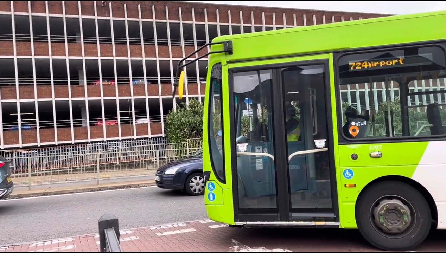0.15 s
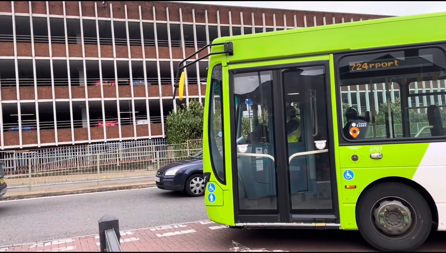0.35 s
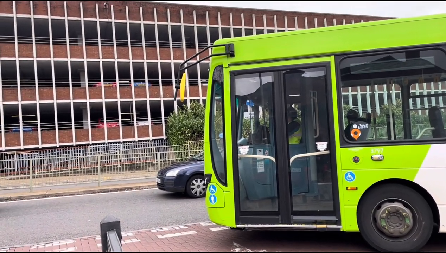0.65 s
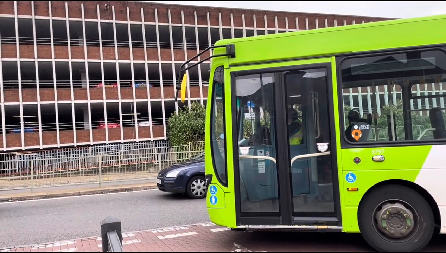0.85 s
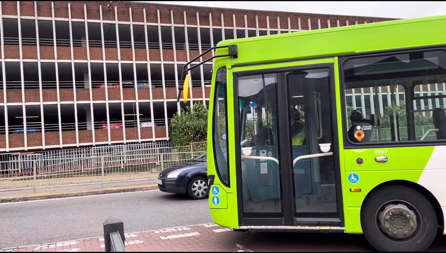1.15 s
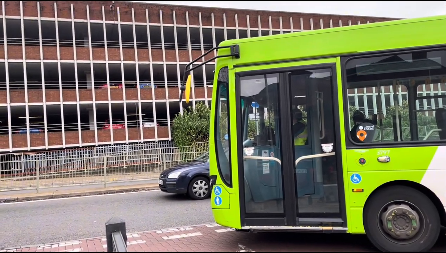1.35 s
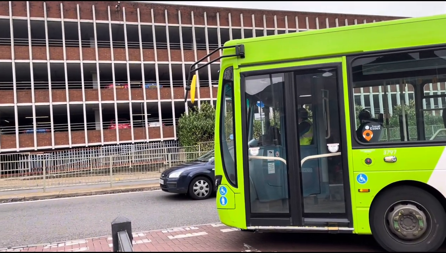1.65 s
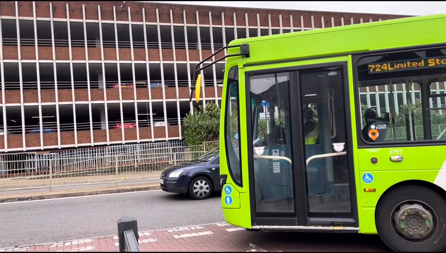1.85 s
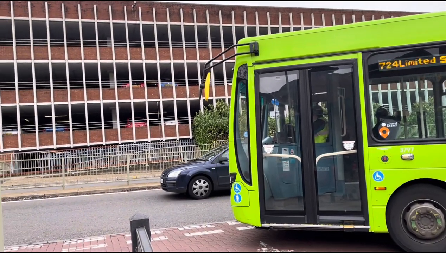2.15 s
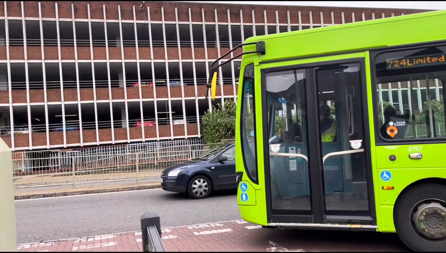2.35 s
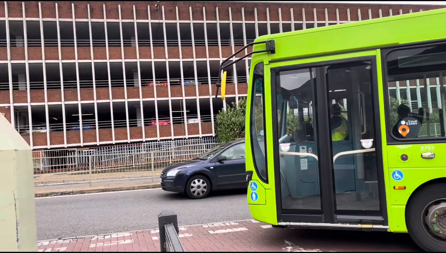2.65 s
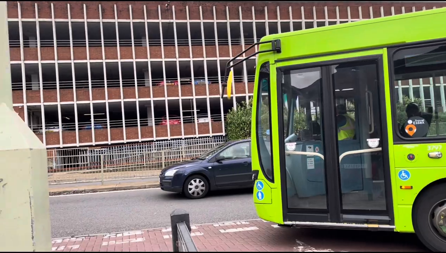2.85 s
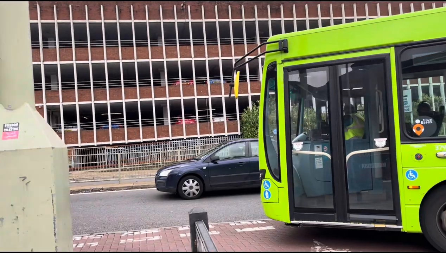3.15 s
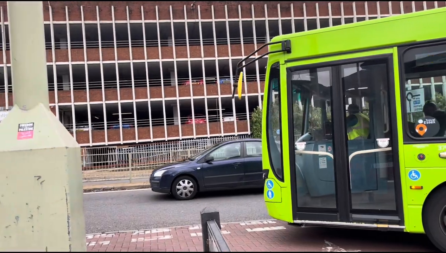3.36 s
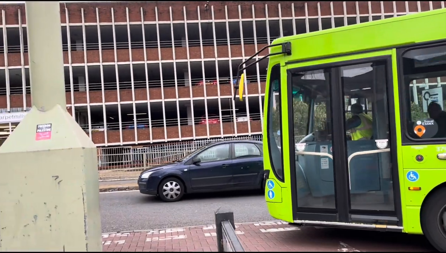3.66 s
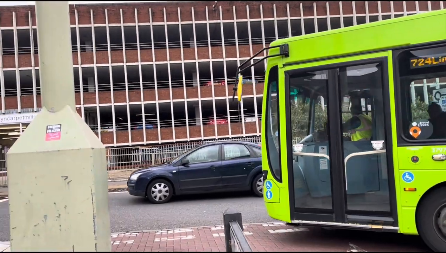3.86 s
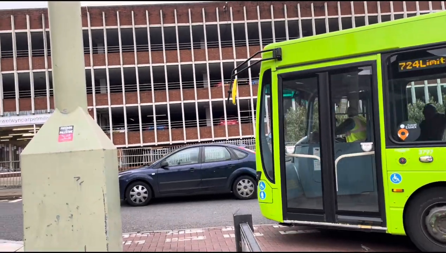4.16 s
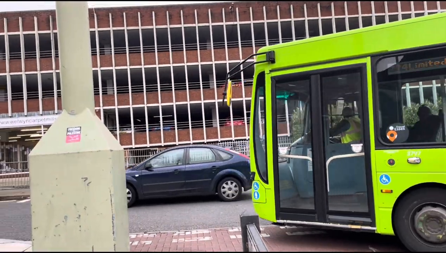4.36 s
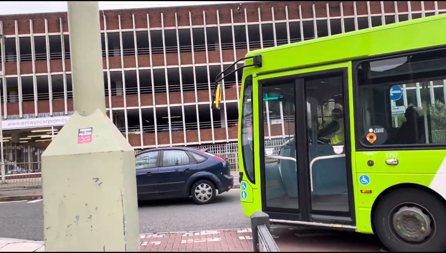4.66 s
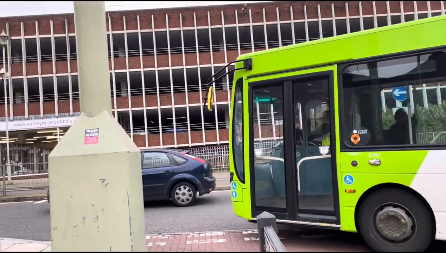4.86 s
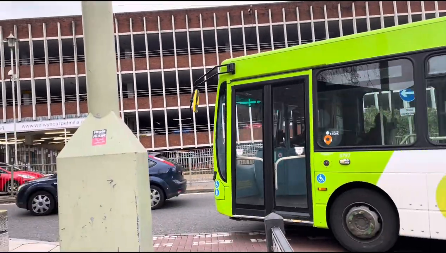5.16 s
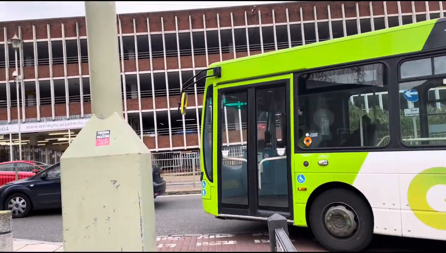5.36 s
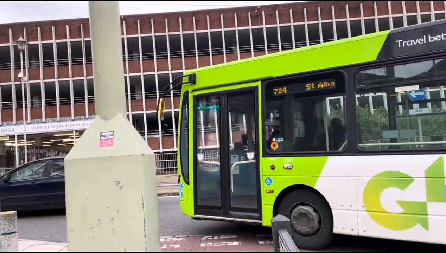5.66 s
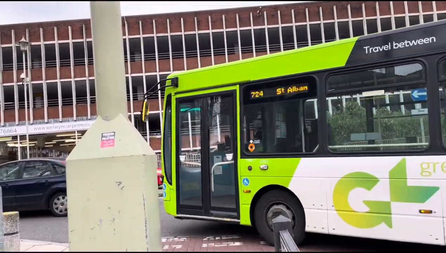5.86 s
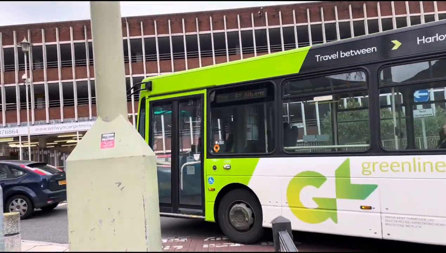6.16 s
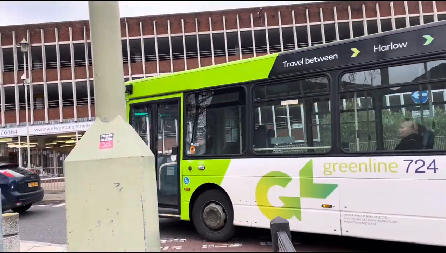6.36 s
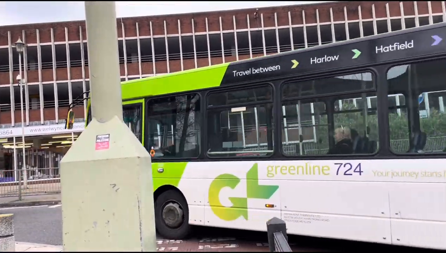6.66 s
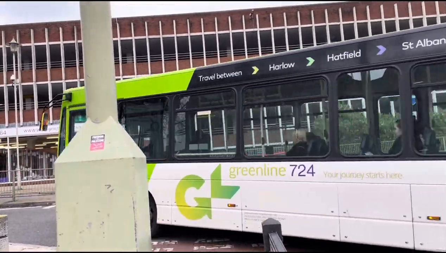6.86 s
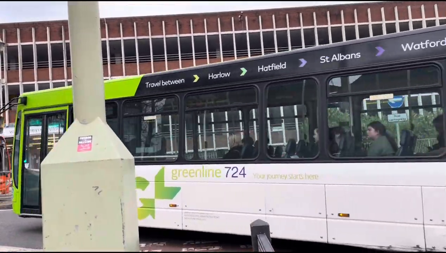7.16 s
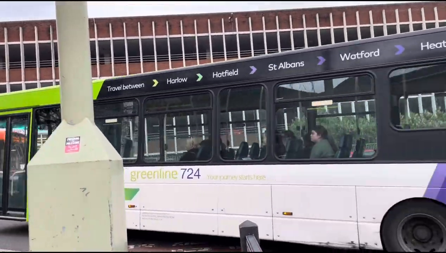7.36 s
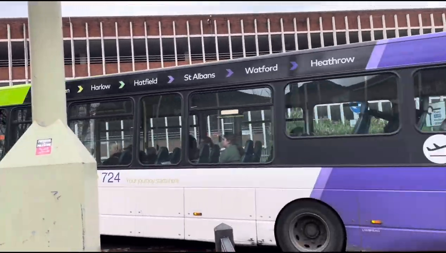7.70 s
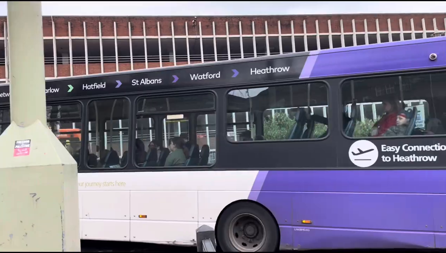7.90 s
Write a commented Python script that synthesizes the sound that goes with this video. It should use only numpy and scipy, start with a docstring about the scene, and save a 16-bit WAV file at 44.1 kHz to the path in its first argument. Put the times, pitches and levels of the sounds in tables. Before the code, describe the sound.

Outdoors on a city street, a diesel bus revs in low gear round a tight turn, body thumping, fittings rattling and squeaking, steering pump whining and air valve hissing briefly. It eases off, then pulls away, its rear engine passing close with booming exhaust, gear whine and belt chirps. Traffic murmurs behind; wind thumps the stereo handheld microphone.

```python
"""A street with a tight turn: a six-cylinder diesel bus revs round it in low gear, eases off, then pulls away
so that its rear engine passes close by. Periodic sources are locked to the crank angle: firings thump the body,
the exhaust booms and growls, gears whine, fittings rattle and a belt chirps. The steering pump is a tone of
varying pitch; the air valve, street traffic and wind on the microphone are filtered noise, with a tonal
hum in the traffic and short tonal slaps in the wind."""
import sys
import numpy as np
from scipy import signal
from scipy.fft import rfft, irfft
from scipy.io import wavfile
from scipy.ndimage import uniform_filter1d, map_coordinates

SR = 44100
rng = np.random.default_rng(int(sys.argv[2]) if len(sys.argv) > 2 else 0)


def transcribe(signal):
    """Save signal, clipped to [-1, 1], as a 16-bit WAV file at the path in sys.argv[1]."""
    frames = np.atleast_2d(signal).T
    limited = np.clip(frames, -1, 1)
    pcm = np.round(limited * 32767).astype(np.int16)
    wavfile.write(sys.argv[1], SR, pcm)


N = 354123
T = np.arange(N) / SR
HZ = np.maximum(np.fft.rfftfreq(N, 1 / SR), 1)

FIRINGS_PER_TURN = 3  # six cylinders, four strokes
STROKE_JITTER_TURNS = .007  # under load the strokes land slightly early or late


def undb(db):
    """Logarithmic level: decibels to amplitude gain."""
    return 10 ** (np.asarray(db) / 20)


def unit(x):
    """Normalization: scale to rms 1."""
    return x / np.sqrt(np.mean(x ** 2))


def curves(table):
    """Linear interpolation: each column after the time becomes a continuous control."""
    s, *columns = np.transpose(table)
    return [np.interp(T, s, column) for column in columns]


def over_hz(points):
    """Spectral interpolation: join (hz, value) points on a log-frequency axis."""
    hz, value = np.transpose(points)
    return np.interp(np.log(HZ), np.log(hz), value)


def walk(rate):
    """Low-pass random process: slow chance of spread about 1, changing about rate times a second."""
    steps = rng.standard_normal(2048)
    path = np.interp(2 * rate * T, np.arange(len(steps)), steps)
    return 1.2 * uniform_filter1d(path, int(SR / rate / 4))


def ramp(s, length):
    """Linear envelope: rise from 0 to 1, starting at time s."""
    return np.clip((T - s) / length, 0, 1)


def swell(peak_s, spread_s):
    """Gaussian envelope: a smooth rise to 1 and fall around a moment."""
    return np.exp(-.5 * ((T - peak_s) / spread_s) ** 2)


def pulling_away():
    """Load transfer: rise from 0 to 1 as the drive takes up the load."""
    return ramp(4.33, .69)


def add(out, s, x):
    """Superposition: mix x in at time s."""
    i = max(int(s * SR), 0)
    out[:, i:i + x.shape[1]] += x[:, :N - i]


# left level minus right: pitch_hz, difference_db
TILT = [(60, 0), (110, 0), (360, -1), (900, 3), (1700, 0), (2500, 0), (3000, 2.5), (3600, 2), (4800, 5),
        (5500, -1), (7600, 6.5), (13100, -1)]
# phase difference between left and right, opposed near 8 kHz: pitch_hz, phase_rad
PHASE = [(200, -.2), (600, -.55), (1000, -1.6), (1500, -1.5), (2000, -.5), (2900, 1.2), (3300, 0),
         (6000, 0), (7000, -.5), (7700, -3.14), (8600, -3.14), (10200, -6.28)]


def ports(left, right):
    """Stereo colouring: from two spectra, level and phase differ between left and right by pitch."""
    tint = undb(over_hz(TILT) / 2) * np.exp(.5j * over_hz(PHASE))
    return irfft(np.array([left * tint, right / tint]), N)


# likeness of left and right: pitch_hz, likeness_0_to_1
LIKENESS = [(60, 0.72), (250, 0.66), (600, 0.57), (1000, 0.06), (2400, 0.7), (3100, 0.25), (3600, 0.83),
            (6500, 0.74), (7400, 0.4), (7700, 1), (13000, 0.84)]


def noise(spectrum, drive=None):
    """Interchannel coherence: coloured stereo noise of rms 1, most diffuse around 1 kHz."""
    if drive is None:
        drive = rng.standard_normal((2, N))
    like = over_hz(LIKENESS)
    mid, side = rfft(drive) * undb(over_hz(spectrum)) * np.sqrt([1 + like, 1 - like])
    return unit(ports(mid + side, mid - side))


def burst(length, lo_hz, hi_hz, spread):
    """Turbulence: a noise puff that swells fast and dies away; rms near 1 over its length."""
    t = T[:int(4 * length * SR) + 2000]
    top = signal.butter(2, min(hi_hz, .45 * SR), fs=SR, output="sos")
    bottom = signal.butter(2, lo_hz, "high", fs=SR, output="sos")
    shape = np.sqrt(t / length) * np.exp(-2.2 * t / length)
    shaped = rng.standard_normal((2, len(t))) * shape
    mid, side = signal.sosfilt(np.vstack([top, bottom]), shaped)
    puff = np.array([mid + spread * side, mid - spread * side])
    return puff / np.sqrt(np.sum(puff ** 2) / (2 * length * SR))


def blip(hz, glide, spread_s):
    """Gaussian tone burst: a short gliding tone whose envelope peaks, at rms 1, three spreads in."""
    t = T[:int(6 * spread_s * SR)] - 3 * spread_s
    envelope = np.exp(-.5 * (t / spread_s) ** 2)
    tone = np.sqrt(2) * envelope * np.sin(2 * np.pi * (hz + glide * t / 2) * t)
    return np.array([tone, tone])


def strokes(turns, per_turn, scatter_db, jitter_s=0):
    """Periodic impact: impulses locked to the crank, each with its own force and slight timing error."""
    at = np.flatnonzero(np.diff(np.floor(turns * per_turn)))
    force, lag = rng.standard_normal(size=(2048, 2))[:len(at)].T
    late = (lag * jitter_s * SR).astype(int)
    return np.bincount(np.clip(at + late, 0, N - 1), undb(scatter_db * force), N)


def grains(impulses, length):
    """Convolution: each impulse becomes a short swell; the whole has rms 1."""
    return unit(signal.oaconvolve(impulses, np.hanning(int(length * SR)), "same"))


def stack(turns, orders, waver_db, rate, smeared=False):
    """Engine orders: crank-rate multiples waver independently, in phase unless smeared by their path."""
    lags = smeared * rng.random(len(orders))
    total = 0
    for (multiple, db), lag in zip(orders, lags):
        level = undb(db + waver_db * walk(rate))
        total = total + level * np.sqrt(2) * np.cos(2 * np.pi * (multiple * turns + lag))
    return total


def whine(cycles, flutter_db, rate):
    """Multipath interference: shifting street echoes flutter a tone's level, and its phase at each ear."""
    shared = undb(flutter_db * walk(rate))
    ears = [np.sin(2 * np.pi * cycles + 0.53 * walk(rate)) for _ in range(2)]
    return np.sqrt(2) * shared * np.array(ears)


# rear engine to microphone: time_s, distance_m
DISTANCE = [(0, 9.7), (2.2, 9.55), (3.6, 9.4), (4.8, 7.7), (5.7, 6.26), (6.5, 5.27), (7, 3.95), (7.7, 3.44),
            (8.03, 3.94)]
# accelerator: time_s, throttle_0_to_1
THROTTLE = [(0, 0.77), (.5, 0.87), (1.3, 0.62), (1.9, 0.68), (2.6, 0.49), (3.0, 0.17), (3.9, 0),
            (4.6, 0.35), (5.5, 0.67), (8.03, 0.61)]
# engine parts by name: idle_at_10_m_db, added_by_full_throttle_db, added_per_halved_distance_db
LOUDNESS_DB = {"roar": (-37.5, 10, 3.5), "clatter": (-42.5, 2.5, 8.5), "hiss": (-48.5, 0, 9),
               "shake": (-48, 25, 0), "belt": (-59.5, 5, 11.3)}
FAR_M = 10


def loudness(part):
    """Distance law: level in dB of one part of the engine, from throttle and distance."""
    idle_db, throttle_db, near_db = LOUDNESS_DB[part]
    throttle, = curves(THROTTLE)
    metres, = curves(DISTANCE)
    return idle_db + throttle_db * throttle + near_db * np.log2(FAR_M / metres)


def cyclic(turns, share):
    """Cyclostationarity: white noise of which a share of the power recurs each engine cycle of two turns."""
    size, changes_per_s = 4096, .5
    other_turn = .3  # gain at which each turn of the pattern is mixed into the other
    place = turns / 2 * size
    patterns = rng.standard_normal((2, 2, size))
    patterns = patterns + other_turn * np.roll(patterns, size // 2, axis=2)
    change = 2 * np.pi * changes_per_s * T  # the pattern turns slowly into another

    def read(pattern):
        """Table lookup: the pattern at the current crank angle."""
        return map_coordinates(pattern, [place % size], order=1, mode="nearest")

    repeating = np.array([np.cos(change) * read(a) + np.sin(change) * read(b) for a, b in patterns])
    return np.sqrt(share) * unit(repeating) + np.sqrt(1 - share) * rng.standard_normal((2, N))


# block roar spectrum: pitch_hz, density_db_per_hz
ROAR = [(90, 2.5), (150, -3), (210, -3.5), (275, -7), (350, -3.5), (480, -3.5), (620, -7.5), (830, -12.5),
        (980, -21), (1400, -48), (2500, -108)]
# combustion clatter spectrum: pitch_hz, density_db_per_hz
CLATTER = [(470, 1.5), (800, 6.5), (979, 0.5), (1420, 1), (1750, -5.5), (2490, -0.5), (2790, -3),
           (2860, -3.5), (3100, -2.5), (3530, -12.5), (3860, -10), (5500, -14.5), (7150, -58),
           (12100, -120)]
# treble hiss of the engine bay: pitch_hz, density_db_per_hz
HISS = [(3500, -1), (4800, 1.5), (6800, -1), (8000, -5), (9700, -12), (12000, -18.5), (13700, -24)]
ROAR_REPEATS, CLATTER_REPEATS = .55, .3  # shares of power that repeat each engine cycle


def engine_bay(turns):
    """Amplitude modulation: cyclic roar and clatter, and plain hiss, pulse with firings and crank turns."""
    knock = np.cos(2 * np.pi * FIRINGS_PER_TURN * turns) + 0.78 * np.cos(2 * np.pi * turns)
    roar_db = loudness("roar") + 1.0 * knock + 1.0 * walk(4.4)
    roar = noise(ROAR, cyclic(turns, ROAR_REPEATS)) * undb(roar_db)
    clatter_db = loudness("clatter") + 0.39 * knock + 1.26 * walk(10)
    clatter = noise(CLATTER, cyclic(turns, CLATTER_REPEATS)) * undb(clatter_db)
    hiss = noise(HISS) * undb(loudness("hiss") + 0.49 * knock + .5 * walk(23))
    return roar + clatter + hiss


# drone under load: multiple_of_crank_rate, level_db
LUMPS = [(2, -8), (3, -13), (4, -2), (6, -5.5), (9, -14), (12, -11.5), (14, -13), (18, -11.5), (25, -20)]
# body panel resonances: pitch_hz, half_width_hz, boost_db
PANELS = [(69.4, 1.7, 12), (133.4, 2.1, 7.5), (266, 8.1, 2.5), (312, 9.9, 5), (438.3, 3.2, 7.5)]
# what a thump rings in the body: pitch_hz, width_hz, level_db
BODY_MODES = [(69.2, 6, 2.5), (95, 15, -8), (136.6, 7.6, -8.5)]
# the heaviest thumps: start_s, level_over_ordinary_db
THUDS = [(1.565, 2), (1.864, -1), (2.275, -2), (2.439, 8), (2.56, 2)]
# thumping as the bus labours round the turn: time_s, level_db
THROB = [(0, -35), (.75, -32), (1.05, -23.5), (1.5, -23), (2.1, -25), (2.6, -25), (2.8, -36), (3.5, -45),
         (4.6, -55)]
THUMP_LOW_HZ, THUMP_TOP_HZ = 42, 190
THUMP_SCATTER_DB, THUMP_JITTER_S = 3, .0016


def body(turns, crank_hz):
    """Modal resonance: a thump per crank turn rings the body; orders drone as they cross panel modes."""
    blows = strokes(turns, 1, THUMP_SCATTER_DB, THUMP_JITTER_S)
    for s, db in THUDS:
        blows[int(s * SR)] += undb(db)
    modes = sum(undb(db) / (1 + 1j * (HZ - hz ** 2 / HZ) / width) for hz, width, db in BODY_MODES)
    soft = signal.butter(4, [THUMP_LOW_HZ, THUMP_TOP_HZ], "band", fs=SR, output="sos")
    thumps = unit(signal.sosfilt(soft, irfft(rfft(blows) * modes, N)))
    throb_db, = curves(THROB)
    orders = []
    for multiple, db in LUMPS:
        boosts = [boost / (1 + ((multiple * crank_hz - hz) / width) ** 2) for hz, width, boost in PANELS]
        orders.append((multiple, db + sum(boosts)))
    uneven = turns + STROKE_JITTER_TURNS * walk(30)
    drone = undb(loudness("shake")) * stack(uneven, orders, waver_db=2.6, rate=16, smeared=True)
    labour = 1 - pulling_away()  # the shake dies out as the bus gets rolling
    return labour * (undb(throb_db) * thumps + drone)


# gritty rattle in the tight turn: pitch_hz, density_db_per_hz
RATTLE = [(1350, -27), (1750, 3), (2300, -4), (2780, 0), (3050, -17), (3900, -20), (4200, -3), (4850, -13),
          (5200, -28)]
RATTLE_DB, RATTLE_PEAK_S, RATTLE_SPREAD_S = -47, 0.58, 1
RATTLES_PER_TURN, RATTLE_SCATTER_DB, RATTLE_RING_S = 4, 3, .02
SQUEAK_LOW_HZ, SQUEAK_HIGH_HZ, SQUEAK_MAX_GLIDE_HZ_PER_S = 1700, 2800, 2500
SQUEAK_SPREAD_S, SQUEAK_DB, SQUEAK_UNTIL_S = .014, -50, 3.2  # spread varies by half either way


def rattle(turns):
    """Impact noise: loose fittings chatter in flurries and squeak while the bus labours round the turn."""
    impacts = strokes(turns, RATTLES_PER_TURN, RATTLE_SCATTER_DB, jitter_s=.002)
    flurries = undb(2.5 * walk(9)) * grains(impacts, RATTLE_RING_S)
    chatter = undb(RATTLE_DB) * swell(RATTLE_PEAK_S, RATTLE_SPREAD_S) * flurries * noise(RATTLE)
    squeaks = np.zeros((2, N))
    for when, pitch, glide, span in rng.random(size=(44, 4)):
        hz = SQUEAK_LOW_HZ + (SQUEAK_HIGH_HZ - SQUEAK_LOW_HZ) * pitch
        glide_hz_per_s = SQUEAK_MAX_GLIDE_HZ_PER_S * (2 * glide - 1)
        squeak = blip(hz, glide_hz_per_s, SQUEAK_SPREAD_S * (.5 + span))
        add(squeaks, when * SQUEAK_UNTIL_S, undb(SQUEAK_DB) * squeak)
    return chatter + ports(*rfft(squeaks))


# hydraulic steering pump: time_s, pitch_hz, level_db
PUMP = [(0, 861, -54), (.25, 855, -44.5), (.7, 841, -41), (1.15, 837, -42), (1.31, 817, -41),
        (1.42, 745, -42.5), (1.49, 715, -58), (1.56, 765, -46), (1.68, 813, -45), (1.77, 819.7, -51),
        (1.95, 825, -43.5), (2.1, 837, -39), (2.6, 839, -38), (3.1, 838, -40.5), (3.25, 866, -48),
        (3.4, 860, -100)]
PUMP_OVERTONE_DB = -19.5  # relative to the fundamental


def steering():
    """Frequency modulation: the pump's note dips as the wheel is eased, with a thin fourth harmonic."""
    pitch, db = curves(PUMP)
    cycles = np.cumsum(pitch) / SR
    overtone = undb(PUMP_OVERTONE_DB) * whine(4 * cycles, flutter_db=3.5, rate=20)
    return undb(db) * (whine(cycles, flutter_db=1.0, rate=12) + overtone)


# street traffic spectrum: pitch_hz, density_db_per_hz
STREET = [(15, -35), (25, 13), (70, 4), (223, 2.5), (258, 4), (479, -4.5), (527, -9.5), (684, -5),
          (771, -15), (848, -1.5), (955, -14), (1770, -14), (2250, -12), (7400, -43), (9620, -116),
          (16300, -120)]
STREET_DB = -35
HUM_HZ, HUM_RISE_HZ_PER_S, HUM_WAVER_HZ = 271, 97, 4.64
HUM_PEAK_S, HUM_SPREAD_S, HUM_DB = 2.05, 0.22, -34.5


def traffic():
    """Broadband background: street noise, and a rough hum that rises out of it for about a second."""
    pitch = HUM_HZ + HUM_RISE_HZ_PER_S * (T - HUM_PEAK_S) + HUM_WAVER_HZ * walk(20)
    tone = whine(np.cumsum(pitch) / SR, flutter_db=3, rate=25)
    hum = undb(HUM_DB) * swell(HUM_PEAK_S, HUM_SPREAD_S) * tone
    return hum + noise(STREET) * undb(STREET_DB + 2.0 * walk(1.97))


# wind rumble on the ports: pitch_hz, density_db_per_hz
RUMBLE = [(20, -42), (35, -2.5), (58, 3.5), (110, 1), (165, -5), (220, -15.5), (320, -13.5), (600, -32),
          (1200, -74)]
# gusts over a steady breeze: peak_s, rise_s, fall_s, level_db
GUSTS = [(0, .1, .4, -26), (1.2, 0.46, 0.52, -34), (2.55, 0.89, 0.3, -20.5), (4.1, 0.042, 0.084, -31),
         (4.45, 0.063, 0.044, -20.5), (5.6, 0.23, 0.33, -22), (7.6, 0.57, 0.52, -19.5)]
# the strongest buffets: start_s, level_db, length_s (level before the port filters)
BUFFETS = [(2.266, -28, 0.029), (2.415, -23.5, 0.088), (2.655, -22.5, 0.05), (2.75, -18.5, 0.019),
           (2.863, -23, 0.01), (2.894, -25.5, 0.012), (2.923, -27.5, 0.026), (2.953, -22.5, 0.016),
           (2.968, -19, 0.011), (2.989, -22.5, 0.016), (3.186, -28.5, 0.023), (3.239, -35, 0.015),
           (3.323, -29.5, 0.031), (3.708, -32.5, .04), (4.081, -26.5, 0.042), (4.386, -28, 0.026),
           (4.42, -19, 0.019), (4.45, -25, 0.019), (4.697, -26.5, 0.016), (4.723, -24, 0.01),
           (4.765, -22, 0.035), (4.958, -25.5, 0.056), (5.56, -26, 0.058), (5.681, -29.5, .06),
           (5.801, -20.5, 0.043), (5.848, -21, 0.031), (5.915, -13.5, 0.055), (5.977, -19, 0.051),
           (6.042, -28, 0.038), (6.109, -24.5, 0.05), (6.217, -19, 0.032)]
# sharp slaps of air, about one cycle long: peak_s, level_db, pitch_hz (level before the port filters)
SLAPS = [(2.756, -13, 477), (2.763, -12.5, 250), (2.899, -23, 550), (2.971, -12, 598), (3.305, -14, 520),
         (4.422, -13, 404), (4.704, -17.5, 400), (5.989, -10, 170)]
BREEZE_DB = -35.5
EDDY_LOW_HZ, EDDY_TOP_HZ = 111, 795
PORT_HZ, PORT_DB = 289, 3  # hollow ring of the port that an eddy strikes
EDDY_S, KNEE_HZ, KNEE_SLOPE = 0.021, 417, 0.68  # a shorter eddy is brighter: its knee at this length
WEAK_EDDY_DB, WEAK_SCATTER_DB = -10, 2  # relative to the gust; scatter either way


def wind():
    """Turbulent pressure: gusts rumble on the ports; eddies thump and slap, hollow at 289 Hz, dull on top."""
    gusts = []
    for s, rise, fall, db in GUSTS:
        width = np.where(T < s, rise, fall)
        gusts.append(undb(db) * np.exp(-.5 * ((T - s) / width) ** 2))
    strength = np.maximum(undb(BREEZE_DB), np.max(gusts, axis=0))
    rumble = noise(RUMBLE) * strength * undb(2.0 * walk(12))
    gust_db = 20 * np.log10(strength)
    weak = []  # weak eddies come at random times
    for when, force, span in rng.random(size=(40, 3)):
        db = gust_db[int(when * N)] + WEAK_EDDY_DB + WEAK_SCATTER_DB * (2 * force - 1)
        weak.append((when * T[-1], db, EDDY_S * (1 + span)))
    eddies = np.zeros((2, N))
    for s, db, length in BUFFETS + weak:
        knee_hz = KNEE_HZ * (EDDY_S / length) ** KNEE_SLOPE
        add(eddies, s, undb(db) * burst(length, EDDY_LOW_HZ, knee_hz, spread=0.38))
    for s, db, hz in SLAPS:
        add(eddies, s - 1 / hz, undb(db) * blip(hz, 0, 1 / (3 * hz)))
    hollow = undb(PORT_DB / (1 + ((HZ - PORT_HZ) / 50) ** 2))
    dull = signal.butter(4, EDDY_TOP_HZ, fs=SR, output="sos")
    return rumble + signal.sosfilt(dull, irfft(rfft(eddies) * hollow, N))


# drive belt chafing: pitch_hz, density_db_per_hz
BELT_BAND = [(3000, -25), (3400, 2.5), (3560, -5), (3700, -2), (4100, -73)]
# the loudest belt chirps: time_s, level_db
CHIRPS = [(6.587, -43), (6.661, -37), (6.757, -34.5), (6.782, -33.5), (6.903, -34.5), (7.05, -38),
          (7.273, -37), (7.443, -30), (7.564, -36)]
CHIRP_HZ, CHIRP_SCATTER_HZ, CHIRP_SPREAD_S = 3570, 60, 0.0037
CHAFES_PER_TURN, CHAFE_SCATTER_DB = 2, 2.5


def belt(turns):
    """Friction: the belt chafes in short chirps, louder as the engine comes close; a few stand out."""
    chafes = grains(strokes(turns, CHAFES_PER_TURN, CHAFE_SCATTER_DB, jitter_s=.004), length=.016)
    chafing = noise(BELT_BAND) * undb(loudness("belt")) * chafes
    chirps = np.zeros((2, N))
    for (s, db), detune in zip(CHIRPS, rng.standard_normal(len(CHIRPS))):
        chirp = blip(CHIRP_HZ + CHIRP_SCATTER_HZ * detune, 0, CHIRP_SPREAD_S)
        add(chirps, s - 3 * CHIRP_SPREAD_S, undb(db) * chirp)
    return chafing + chirps


# main gear whine, fading in and out as the bus moves: time_s, level_db
MESH = [(4.6, -62), (5.06, -43.5), (5.23, -54), (5.37, -43), (5.45, -58), (5.53, -45), (5.65, -48),
        (5.76, -45), (5.83, -39), (6.3, -39.5), (6.6, -51), (6.8, -36), (6.92, -36.5), (7.05, -42),
        (7.24, -40), (7.33, -32), (7.41, -33), (7.46, -36), (7.62, -52), (7.84, -37), (8.03, -41)]
# other gear whines: multiple_of_crank_rate, peak_s, spread_s, level_db, roughness_rad
GEARS = [(100.3, .68, .1, -46, .6), (101.4, 1.35, .3, -49.5, 4), (100.8, 2.22, .18, -48, 2.2),
         (144, 2.3, .3, -54, 1.2), (144, 1.5, .3, -56, 1.5), (216, .5, .2, -55.5, 1.2),
         (125.1, 6.93, .36, -39.5, .55), (125.1, 7.82, .08, -39.5, 1.1), (100.2, 7.6, .33, -42, .7),
         (64.5, 7.9, .25, -38.5, 3), (72, 7.85, .18, -42, 1.2), (110, 7.7, .22, -42.5, 3.5),
         (116, 7.65, .2, -44, 1.2), (175, 7.2, .45, -47, 1.3), (175, 7.77, .07, -43, .6),
         (195, 7.8, .15, -49, 2), (215, 7.76, .2, -43.5, .65), (298.5, 7.45, .55, -47, .4),
         (323.5, 7.4, .38, -47, .4), (350.4, 7.5, .45, -48, .5)]
MESH_ORDER = 144  # multiple of the crank rate


def gears(turns):
    """Gear meshing: tones locked to the crank swell as their side faces the kerb; backlash roughens them."""
    mesh_db, = curves(MESH)
    out = pulling_away() * undb(mesh_db) * whine(MESH_ORDER * turns, flutter_db=1.5, rate=15)
    for multiple, peak_s, spread_s, db, rough in GEARS:
        backlash = rough * walk(25) / (2 * np.pi)
        tone = whine(multiple * turns + backlash, flutter_db=2.4, rate=12)
        out = out + undb(db) * swell(peak_s, spread_s) * tone
    return ports(*rfft(out))


# air valve: start_s, length_s, level_db, centre_hz (level before the vent filter)
AIR = [(0.917, 0.087, -49.5, 10900), (0.965, 0.17, -51.5, 10600), (1.07, 0.12, -48, 6850),
       (1.325, 0.29, -59, 10700), (1.425, 0.29, -49, 6690), (1.615, .045, -49, 11000)]


def air_valve():
    """Jet noise: short releases of brake air, each coloured by its vent."""
    out = np.zeros((2, N))
    for s, length, db, hz in AIR:
        vent = signal.butter(2, [hz * 0.41, hz * 1.25], "band", fs=SR, output="sos")
        jet = burst(length, hz / 2, hz, spread=0.07)
        add(out, s, undb(db) * signal.sosfilt(vent, jet))
    return ports(*rfft(out))


# exhaust boom as the bus pulls away: time_s, level_db of the firing tone
BOOM = [(4.6, -25.5), (5.15, -30), (5.32, -15), (5.6, -19), (5.85, -15), (6.02, -23), (6.25, -21.5),
        (6.33, -35), (6.65, -28), (6.95, -15), (8.03, -14.5)]
# buzz of unequal cylinders: multiple_of_crank_rate, level_db
OVERTONES = [(4, -13.5), (4.5, -5), (8, -8), (9, -3.5), (14, -7), (18, -5), (20, -5.5), (24, -6.5),
             (26, -6)]
# gas puffed out at each firing: pitch_hz, density_db_per_hz
GROWL = [(130, -29), (200, 1), (320, 5), (440, 8), (540, -12), (750, -22), (1200, -60)]
GROWL_DB, GROWL_DEPTH_DB = -34, 9
BUZZ_DB, BUZZ_PEAK_S, BUZZ_SPREAD_S = -31.5, 7.49, 0.6  # swells as the tailpipe goes by
# the octave while the body hides the tailpipe, and once it swings into view
OCTAVE_HIDDEN_DB, OCTAVE_OPEN_DB, TAIL_SHOWS_S, TAIL_SWING_S = -36.5, -18, 6.82, 0.35


def exhaust(turns):
    """Pulsating flow: the pipe booms at the firing rate; octave, buzz and puffs grow as the tail appears."""
    boom_db, = curves(BOOM)
    boom = undb(boom_db) * stack(turns, [(FIRINGS_PER_TURN, 0)], waver_db=0.15, rate=36)
    octave_db = OCTAVE_HIDDEN_DB + (OCTAVE_OPEN_DB - OCTAVE_HIDDEN_DB) * ramp(TAIL_SHOWS_S, TAIL_SWING_S)
    octave = undb(octave_db) * stack(turns, [(2 * FIRINGS_PER_TURN, 0)], waver_db=1.5, rate=13)
    uneven = turns + STROKE_JITTER_TURNS * walk(30) / 2
    buzz = undb(BUZZ_DB) * stack(uneven, OVERTONES, waver_db=3.5, rate=11, smeared=True)
    puffs = unit(undb(GROWL_DEPTH_DB * np.cos(2 * np.pi * FIRINGS_PER_TURN * turns)))
    growl = undb(GROWL_DB) * puffs * noise(GROWL)
    passing = swell(BUZZ_PEAK_S, BUZZ_SPREAD_S)
    return pulling_away() * (boom + octave + passing * (buzz + growl))


# engine speed: time_s, crank_turns_per_s
SPEED = [(0, 21.95), (.7, 22.6), (1.5, 23.65), (2.55, 24.9), (2.9, 23.2), (3.3, 20.3), (4.1, 14),
         (4.4, 14.8), (4.75, 17), (5.35, 18.2), (5.55, 18.83), (5.8, 19.87), (6, 20.3), (6.45, 20.4),
         (6.75, 20.57), (7.1, 20.5), (7.68, 20.23), (7.82, 19.6), (8.03, 18.2)]


def scene():
    """Superposition: the bus, the street and the wind, with one crank angle driving the engine parts."""
    crank_hz, = curves(SPEED)
    turns = np.cumsum(crank_hz * (1 + .0005 * walk(10))) / SR
    engine = engine_bay(turns) + body(turns, crank_hz) + rattle(turns)
    engine = engine + belt(turns) + gears(turns) + exhaust(turns)
    return engine + steering() + traffic() + wind() + air_valve()


def record(dry):
    """Band limiting: the recorder sheds the deepest bass, cuts the top, and fades briefly in and out."""
    lean = signal.sosfiltfilt(signal.butter(3, 28, "high", fs=SR, output="sos"), dry)
    fade = np.clip(np.minimum(T, T[-1] - T) / .006, 0, 1)
    top = signal.ellip(10, .2, 80, 13700, fs=SR, output="sos")
    return fade * signal.sosfilt(top, lean)


dry = scene()
out = record(dry)
transcribe(out)
```